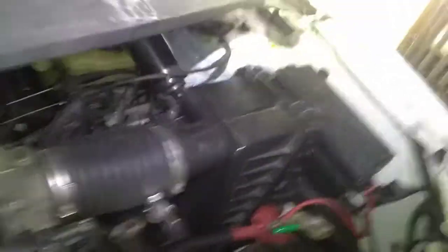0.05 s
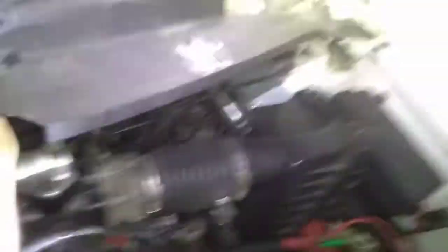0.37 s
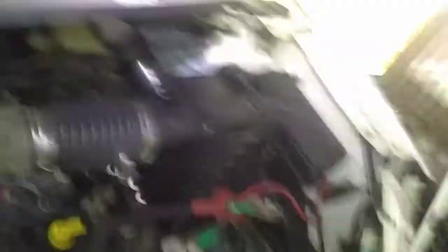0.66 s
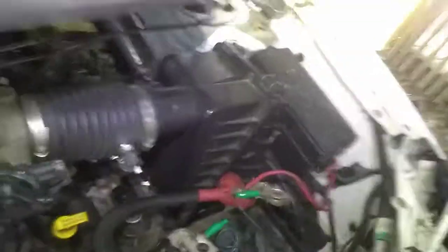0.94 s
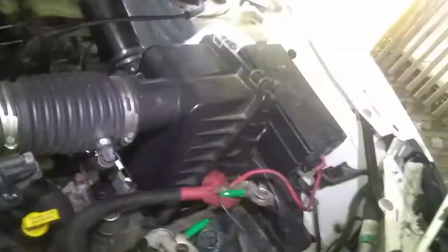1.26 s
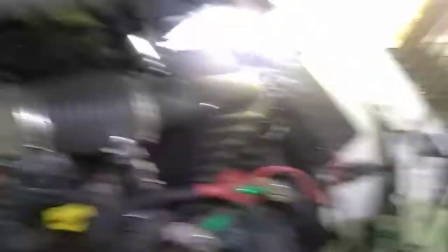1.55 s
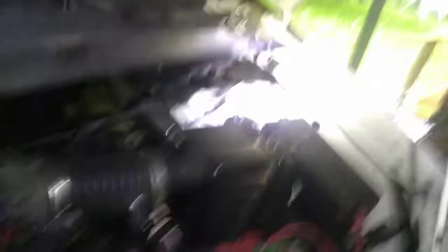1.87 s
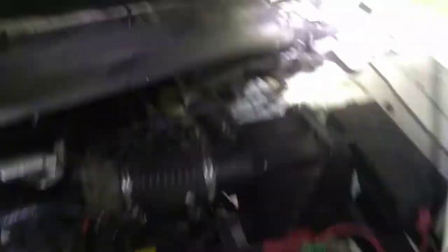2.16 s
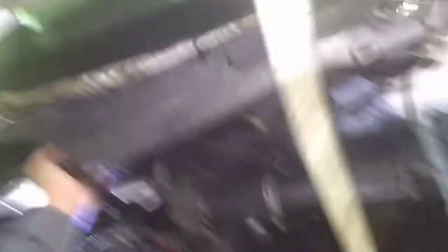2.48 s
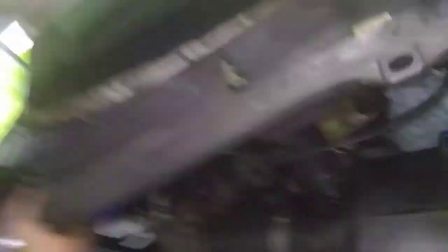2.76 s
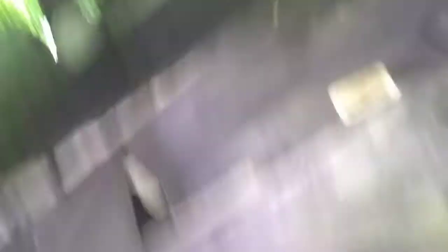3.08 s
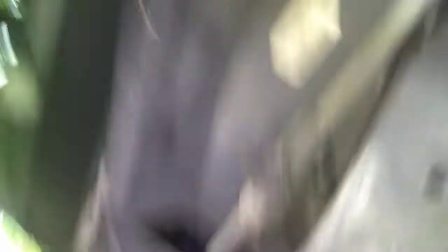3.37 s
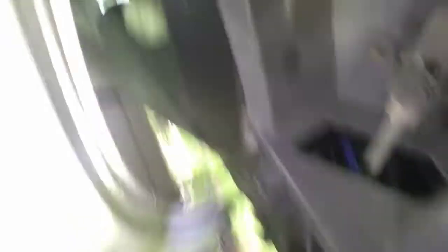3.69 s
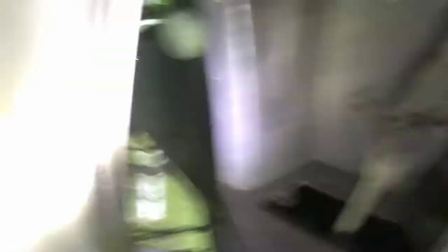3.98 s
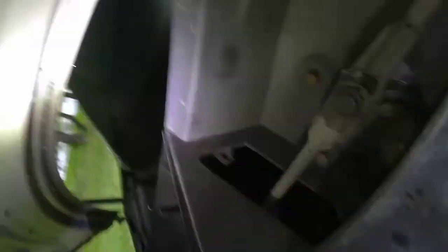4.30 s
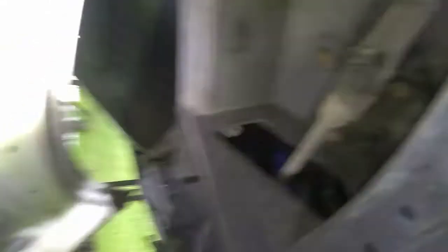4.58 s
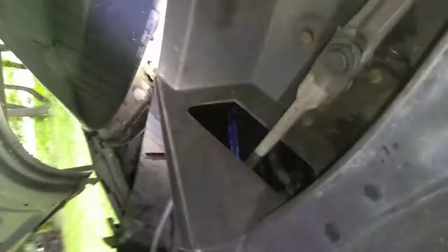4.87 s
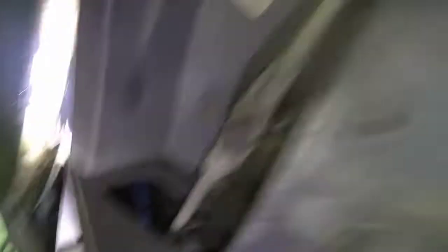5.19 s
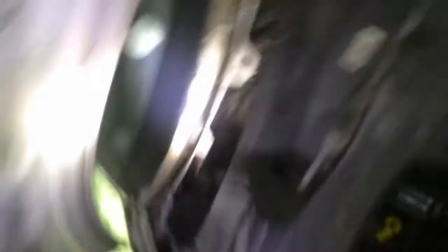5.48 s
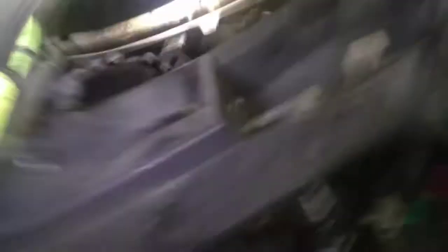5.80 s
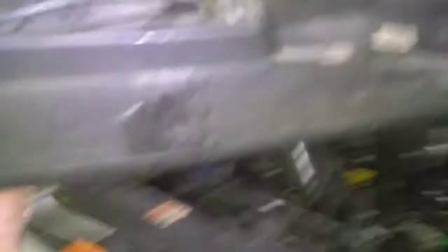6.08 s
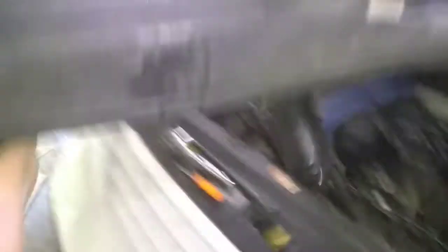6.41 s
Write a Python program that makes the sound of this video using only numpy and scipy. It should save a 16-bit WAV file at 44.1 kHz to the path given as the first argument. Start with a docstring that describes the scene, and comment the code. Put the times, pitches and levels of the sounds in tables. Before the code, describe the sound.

A long plastic panel is worked out of a car's engine bay, close to a hand-held microphone. It opens with a brief judder, a tiny squeak and a cluster of hollow knocks, followed by dull handling thumps. Irregular knocks, some with sharp clicks, continue until about 2 seconds over rubbing rustle and a low rumble of air. A lull follows, with one light scrape near 2.7 seconds. From 3.3 seconds the knocks return more densely, and a hollow in the bodywork hums along. Two heavy blows boom at about 4 and 4.15 seconds; then the rustle drops away while the plastic judders and squeaks briefly. Another strong knock with a scrape comes at 4.9 seconds. At about 5.35 seconds the panel meets something hard with a bright clack, then scrapes away in jerks, fading by 6.6 seconds.

```python
"""A long plastic cowl panel is worked out of an engine bay, close to a rustling hand-held camera.
For two seconds it judders, squeaks and knocks hollowly on the bodywork, some knocks with a sharp click.
After a lull with one light scrape the knocks return, the hollow under the windscreen hums along,
and two heavy blows shake the body. Past five seconds the panel meets something hard with a bright clack
and scrapes away in jerks. The camera subtracts its two microphones from each other for a wide image."""
import sys
import numpy as np
from scipy import signal
from scipy.fft import rfft, irfft
from scipy.io import wavfile
from scipy.ndimage import uniform_filter1d

SR = 44100
rng = np.random.default_rng(int(sys.argv[2]) if len(sys.argv) > 2 else 0)


def put_to_file(sound):
    """Save the sound as 16-bit audio at rate SR, in the file named by the first command-line argument."""
    columns = np.atleast_2d(sound).T  # one column per channel
    safe = np.clip(columns, -1, 1)
    whole_steps = np.round(safe * 32767)
    wavfile.write(sys.argv[1], SR, whole_steps.astype(np.int16))


N = 293265
TIME = np.arange(N) / SR


def undb(db):
    """Decibels to gain."""
    return 10 ** (np.asarray(db) / 20)


def unit_rms(x):
    """Scale to rms 1."""
    return x / np.sqrt(np.mean(x ** 2))


def unit_energy(x):
    """Scale to a mean energy of 1 per channel."""
    return unit_rms(x) / np.sqrt(x.shape[-1])


def freqs(size):
    """Bin frequencies in Hz, floored at 1."""
    return np.maximum(np.fft.rfftfreq(size, 1 / SR), 1)


def contour(points, f):
    """EQ curve in dB through points on a log-frequency axis."""
    hz, db = np.transpose(points)
    return np.interp(np.log(f), np.log(hz), db)


def above(f, corner_hz):
    """Soft shelf from 0 to 1 around the corner."""
    return 1 / (1 + (corner_hz / f) ** 4)


def bell(f, centre_hz, octaves):
    """EQ bell of height 1."""
    return np.exp(-.5 * (np.log2(f / centre_hz) / octaves) ** 2)


def equalise(x, db):
    """Minimum-phase EQ from the folded cepstrum, so attacks stay sharp."""
    size = x.shape[-1]
    cepstrum = irfft(db * np.log(10) / 20, size)
    cepstrum[1:size // 2] *= 2
    cepstrum[size // 2 + 1:] = 0
    return irfft(rfft(x) * np.exp(rfft(cepstrum)), size)


def diffuse(size, alike_hz=800, bass_likeness=0.84):
    """Noise from all sides: the microphones share some bass, but no treble."""
    likeness = bass_likeness * (1 - above(freqs(size), alike_hz))
    mid, side = rfft(rng.standard_normal((2, size))) * np.sqrt([1 + likeness, 1 - likeness])
    return unit_rms(irfft(np.array([mid + side, mid - side]), size))


def wobble(rate_hz, size):
    """Ramps between random values, rms 1."""
    hold = max(int(SR / rate_hz), 1)
    steps = np.repeat(rng.standard_normal(size // hold + 1), hold)
    return unit_rms(uniform_filter1d(steps, hold)[:size])


def fade(t, t60):
    """Decay by 60 dB in t60 seconds."""
    return np.exp(-np.log(1000) * t / t60)


def envelope(t, rise_s, release_at_s, t60):
    """Linear attack, hold, exponential release."""
    return np.minimum(t / rise_s, 1) * fade(np.maximum(t - release_at_s, 0), t60)


def ring(modes, t, scatter_db, detune, spread_rad=0.22):
    """Decaying modes, a little different at each contact; each microphone hears its own phase."""
    hz, db, t60 = np.transpose(modes)[:, :, None]
    strength, shift, phase, skew = rng.standard_normal((4, len(modes), 1))
    angle = 2 * np.pi * hz * (1 + detune * shift) * t + phase
    waves = undb(db + scatter_db * strength) * fade(t, t60) * np.exp(1j * angle)
    pair = [np.sum(waves * np.exp(1j * side * spread_rad * skew), axis=0).imag for side in (1, -1)]
    return unit_energy(np.array(pair))


def pan(db):
    """Stereo gains; positive leans left."""
    return undb([[db / 2], [-db / 2]])


def place(out, sound, start_s, db, head_s=.03):
    """Mix a sound in so that its first head_s has the given rms level."""
    first = int(start_s * SR)
    head_rms = np.sqrt(np.mean(sound[:, :int(head_s * SR)] ** 2))
    out[:, first:first + sound.shape[1]] += (sound * undb(db) / head_rms)[:, :N - first]


# Tone of the open air: freq_hz, gain_db
AIR_EQ = [(25, -37), (100, 0), (300, -9.5), (1000, 2), (3000, -8), (7000, -17), (14000, -20.5)]


def air(db=-68):
    """A faint, steady bed of outdoor hiss."""
    return undb(db) * unit_rms(irfft(rfft(diffuse(N)) * undb(contour(AIR_EQ, freqs(N))), N))


# Fader ride of the rubbing: time_s, level_db
RUB_RIDE = [(0.0, -38.5), (.09, -44.5), (.18, -47.5), (.33, -48), (.5, -45), (0.85, -45), (1.05, -45),
            (1.38, -42), (1.6, -44), (1.81, -46.5), (1.96, -52.5), (2.2, -53), (2.45, -51), (2.92, -54),
            (3.2, -54.5), (4.08, -54), (4.28, -66.5), (4.45, -83), (4.63, -62), (4.78, -64.5), (4.93, -60),
            (5.17, -69), (5.43, -80), (5.58, -68.5), (5.7, -79), (5.85, -59), (5.95, -70), (6.11, -72),
            (6.33, -67), (6.5, -68), (6.65, -67)]
# Tone of the rubbing: freq_hz, gain_db
RUSTLE_EQ = [(20, -35), (60, 6.5), (190, 7.5), (300, -0.5), (550, -1.5), (1000, -3.5), (1700, -13.5),
             (2800, -25.5), (4500, -40), (7000, -51), (10000, -61.5), (14000, -73.5)]
# Camera swings that push air over the microphones: middle_s, spread_s, level_db
CAMERA_SWINGS = [(.45, 0.23, -44.5), (1.05, 0.11, -55), (2.78, 0.15, -44), (4.0, 0.98, -55.5),
                 (5.88, 0.058, -41)]
# Tone of that buffeting: freq_hz, gain_db
RUMBLE_EQ = [(10, -43), (25, -28.5), (40, -16.5), (65, 0), (130, -9), (220, -31), (500, -33), (3000, -85)]


def handling(rustle_db=-41, hiss_db=3, rumble_db=6, still_db=-68, split_hz=2000,
             rustle_slope=0.68, pivot_db=-50.5):
    """Rubbing makes a fine, fluttering rustle; air buffets the microphones as the camera swings."""
    f = freqs(N)
    ride_db = np.interp(TIME, *np.transpose(RUB_RIDE))
    # the lows grow less than the hiss, so harder rubbing is brighter
    low_ride_db = rustle_slope * (ride_db - pivot_db)
    grain = diffuse(N) * undb(-1.18 * wobble(300, N) + wobble(20, N))
    rub = rfft(grain) * undb(contour(RUSTLE_EQ, f))
    rustle = unit_rms(irfft(rub * (1 - above(f, split_hz)), N)) * undb(low_ride_db + rustle_db)
    hiss = unit_rms(irfft(rub * above(f, split_hz), N)) * undb(ride_db + hiss_db)
    draught = undb(still_db) + sum(undb(db) * np.exp(-.5 * ((TIME - middle_s) / spread_s) ** 2)
                                   for middle_s, spread_s, db in CAMERA_SWINGS)
    wind = irfft(rfft(rng.standard_normal((2, N))) * undb(contour(RUMBLE_EQ, f)), N)
    wind = wind - 0.13 * wind[::-1]  # air that presses on one microphone pulls at the other
    gusts = unit_rms(wind * undb(-1.5 * wobble(4.6, N)))
    return rustle + hiss + gusts * draught * undb(rumble_db)


# Hollow tone of the panel, for judders and knocks: freq_hz, gain_db
PANEL_EQ = [(40, -14), (80, -2), (160, 4.5), (300, -7), (550, -13), (1000, -17.5), (1700, -21.5),
            (2800, -30.5), (4500, -49), (7000, -71.5), (10000, -81), (14000, -98)]
# Its bending modes: freq_hz, level_db, t60_s
BENDING_MODES = [(134.7, -5.5, 0.77), (189.3, 4, 0.55), (218.6, 14.5, 0.23), (276.5, 7, 0.45),
                 (325, -17, 0.33), (362, -1.5, 0.4), (423, -5.5, 0.8), (478, -5, 0.52), (503.3, 8, 0.19),
                 (581, 10, 0.12), (744, -4, 0.55), (908, 2.5, 0.37), (1050, 6.5, 0.14), (1260, -9, 0.2)]
# Drags along the bodywork: start_s, length_s, level_db, pitch_hz
JUDDER_CUES = [(0, 0.025, -25, 200), (1.562, 0.03, -36.5, 503), (4.086, 0.095, -26.5, 230),
               (4.362, 0.013, -35.5, 424), (4.418, 0.092, -37.5, 646), (4.561, 0.15, -44, 254),
               (4.985, 0.025, -31, 260)]


def judders(size=24576, catch_db=2, catch_hz=120, ring_db=-2):
    """The panel sticks and slips over the bodywork, which keeps its hollow modes sounding."""
    out, t, f = np.zeros((2, N)), np.arange(size) / SR, freqs(size)
    for start_s, length_s, db, pitch_hz in JUDDER_CUES:
        pressure = envelope(t, rise_s=0.0054, release_at_s=length_s, t60=0.27)
        slips = diffuse(size) * pressure * undb(catch_db * wobble(catch_hz, size))
        modes = ring(BENDING_MODES, t, scatter_db=1.5, detune=.008)
        ringing = irfft(rfft(slips) * rfft(modes), size)
        eq_db = panel_tone(f, pitch_hz, octaves=0.74, boom_db=-7, crack_db=-6)
        sound = unit_energy(equalise(slips, eq_db))
        sound += undb(ring_db) * unit_energy(equalise(ringing, eq_db))
        place(out, sound, start_s, db, head_s=length_s)
    return out


def panel_tone(f, pitch_hz, octaves, boom_db, crack_db):
    """EQ in dB: each contact point favours its own band; soft blows boom, hard ones crack."""
    shelves_db = boom_db * (1 - above(f, 230)) + crack_db * above(f, 1600)
    return contour(PANEL_EQ, f) + 6 * bell(f, pitch_hz, octaves) + shelves_db


# Squeaks of the pulled plastic: start_s, length_s, pitch_hz, glide_hz_per_s, level_db
SQUEAK_CUES = [(0.028, 0.007, 830, -1800, -30), (4.419, 0.023, 688, 3994, -42.5),
               (5.077, 0.045, 402, -3, -46)]


def squeaks(size=8192, waver=0.0079):
    """Plastic slips on paint: short, rough tones that glide."""
    out, t = np.zeros((2, N)), np.arange(size) / SR
    for start_s, length_s, pitch_hz, glide, db in SQUEAK_CUES:
        hz = (pitch_hz + glide * t) * (1 + waver * wobble(480, size))
        tone = np.sin(2 * np.pi * np.cumsum(hz) / SR)
        tone *= envelope(t, rise_s=0.0037, release_at_s=length_s, t60=0.074)
        place(out, np.array([tone, tone]), start_s, db)
    return out


# Panel hits on the bodywork: start_s, level_db, pitch_hz, boom_db, crack_db, t60_s,
# rebound_db, pan_db, low_note_hz, high_note_hz, notes_db
KNOCK_CUES = [(0.0606, -17.5, 470, -19, -9, 0.045, -27, -7, 368, 526, 1.5),
              (.083, -21.5, 430, -15, 1, 0.069, -16, -6, 360, 560, -1.5),
              (.101, -26.5, 400, -9, -10, 0.2, -13, -3, 353.5, 797, -4),
              (0.1101, -24, 340, -6, -16, 0.085, -5.5, -4, 330, 443, -9),
              (0.2497, -20, 760, -5.5, -1, 0.093, -26, -0.5, 486, 602, -9.5),
              (0.874, -30, 378, 0, -7, 0.21, -17, 1.5, 373, 459, -7),
              (1.11, -32, 754, -15, -2, 0.058, -23, -5, 520, 720, -16),
              (1.300, -24, 616, -4.5, 4, 0.09, -30, 0, 375, 1010, -8),
              (1.455, -32, 613, -20, 5, 0.045, -0.5, -6, 577, 1030, -8),
              (1.503, -22.5, 705, -9, 5, 0.093, -12.5, 0, 415, 510, -9),
              (1.645, -26.5, 614, -2.5, -21, 0.048, -25, -1.5, 364, 667, -8),
              (1.883, -19.5, 680, -9, 5, 0.21, -11.5, -4, 386, 682, -16),
              (2.057, -31.5, 680, -15, 4, 0.16, -8.5, -2.5, 352, 665, -2.5),
              (3.319, -26.5, 420, 2, -44, 0.052, -28, 6.5, 271, 567, -1.5),
              (3.387, -27.5, 860, -7.5, -2, 0.14, -6, -3.5, 503, 575, -7.5),
              (3.44, -24, 490, -1.5, 4, 0.072, -32, 8, 397, 587, -8.5),
              (3.522, -26, 1230, -12.5, 4, 0.14, -16, 0.5, 475, 609, -7),
              (3.573, -29.5, 915, -7, -0.5, 0.059, -19, 3, 337, 880, -5),
              (3.61, -32, 1090, -4, -1, 0.12, -26, -0.5, 350, 575, -2.5),
              (3.980, -19.5, 900, -3, 12.5, 0.13, -11, 1, 486, 568, -6),
              (3.990, -22.5, 563, -2, -13.5, 0.1, -22, 12, 505, 589, -3.5),
              (4.033, -25, 900, -1, -8, 0.11, -15, 8, 190, 375, -10),
              (4.103, -36, 800, -1, -14, .05, -25, -2, 210, 560, -7),
              (4.147, -16.5, 418, -7.5, -0.5, 0.051, -22.5, -7, 428, 488, -2),
              (4.166, -23.5, 500, -8, -7, .05, -18, -6, 389, 574, 1),
              (4.204, -25, 500, -8, -7, 0.065, -21, -5.5, 397, 460, 2.5),
              (4.2939, -29, 950, -12, -1.5, 0.08, -15, -3.5, 343, 468, -1),
              (4.876, -30.5, 324, -20, -2.5, 0.22, -27, 5, 243, 404, 1.5),
              (4.920, -17.5, 890, -8, -10, 0.072, -21, 1.5, 404.5, 695, -4),
              (4.931, -23, 750, -15, 3, 0.022, -30, 9, 391, 960, 0),
              (5.024, -32, 350, -5, -10, .05, -22, 1, 280, 404, -9)]


def knocks(size=16384, blow_db=-3, chatter_db=-7, edge_db=5, tick_db=-8, bay_db=-17, modes_db=-5):
    """A chattering blow sets the panel ringing; the engine bay adds a short, dense tail."""
    out, t, f = np.zeros((2, N)), np.arange(size) / SR, freqs(size)
    for start_s, db, pitch_hz, boom_db, crack_db, t60, pan_db, low_hz, high_hz, notes_db in contacts():
        blow = np.zeros((2, size))
        blow[:, 0] = undb(blow_db)
        chatter_s = np.cumsum(rng.uniform(.002, .007, 6))
        chatter = undb(chatter_db) * np.exp(-chatter_s / 0.01) * rng.uniform(.5, 1, 6)
        blow[:, (chatter_s * SR).astype(int)] = chatter
        far_mic = int(pan_db > 0)
        blow[far_mic] = np.roll(blow[far_mic], rng.integers(4, 10))  # arrives a little later
        blow = equalise(blow, edge_db * above(f, 1800))  # the contact is brighter than its ring
        scatter = diffuse(size)
        treble = irfft(rfft(scatter) * above(f, 1600), size)
        tick = undb(tick_db) * unit_energy(treble * fade(t, t60=0.0057))  # the edge's first touch
        bay = undb(bay_db) * unit_energy(scatter * fade(t, t60=0.26))
        eq_db = panel_tone(f, pitch_hz, octaves=0.42, boom_db=boom_db, crack_db=crack_db)
        hit = equalise(blow + tick + sheet_ring(t, t60) + bay, eq_db)
        modes = equalise(ring(BENDING_MODES, t, scatter_db=1.5, detune=.008), eq_db)
        notes = undb(notes_db) * spot_ring(t, low_hz, high_hz, t60)
        sound = unit_energy(hit) + undb(modes_db) * unit_energy(modes) + notes
        give = 1 - np.exp(-t / 0.00047)  # the plastic yields before it takes the full blow
        place(out, sound * give * pan(pan_db), start_s, db)
    return out


def contacts(rebound_s=.054):
    """Each knock, then the springy panel falling back once: lower, duller and ringing longer."""
    for start_s, db, pitch_hz, boom_db, crack_db, t60, rebound_db, *spot in KNOCK_CUES:
        yield start_s, db, pitch_hz, boom_db, crack_db, t60, *spot
        yield (start_s + rebound_s, db + rebound_db, pitch_hz * 0.91,
               boom_db, crack_db - 9.5, t60 * 1.2, *spot)


def sheet_ring(t, t60, grain_db=3):
    """Countless close modes of a plastic sheet, of which the low ones last longest."""
    size = len(t)
    f = freqs(size)
    noise = rfft(diffuse(size) * undb(grain_db * wobble(300, size)))
    over_mid, over_high = above(f, 650), above(f, 1900)
    bands = [(1 - over_mid, t60 * 1.67), (over_mid - over_high, t60 * 0.94), (over_high, t60 * 0.95)]
    return unit_energy(sum(irfft(noise * band, size) * fade(t, tail_s) for band, tail_s in bands))


def spot_ring(t, low_hz, high_hz, t60, stiffening=0.025, relax_s=0.018):
    """The struck spot rings on two hollow notes, a little sharp while it is still bent."""
    bent_t = t + stiffening * relax_s * (1 - np.exp(-t / relax_s))
    notes = [(low_hz, 0, t60 * 1.83), (high_hz, -2, t60 * 1.45)]
    return unit_energy(ring(notes, bent_t, scatter_db=.5, detune=.003) * np.minimum(t / .001, 1))


# Bright tone of the clicks and swishes: freq_hz, gain_db
EDGE_EQ = [(300, -17.5), (1500, 14.5), (3000, 1), (4200, -7.5), (5300, -10.5), (7000, -14), (10000, -24),
           (14000, -37)]
# Ring of a hard contact, for clicks and scrapes: freq_hz, level_db, t60_s
CLACK_MODES = [(445, 3, 0.082), (600, -6, 0.084), (696, -31, 0.24), (831, -4.5, 0.17), (1076, -2.5, 0.18),
               (1290, 2.5, 0.1), (1490, -15, 0.17), (1895, 0, 0.077), (2603, 1, 0.1), (3150, -8, 0.048),
               (3500, 10, 0.029), (3710, 4.5, 0.074)]
# Clicks layered on the attacks: start_s, level_db, t60_s, pitch_hz
CLICK_CUES = [(0.061, -23.5, 0.016, 3000), (1.302, -32, 0.018, 3000), (1.503, -28.5, 0.016, 2800),
              (1.882, -30.5, 0.064, 2720), (3.442, -37.5, 0.012, 3320), (3.522, -36, 0.02, 1710),
              (3.981, -27, 0.037, 5000), (4.147, -31.5, 0.02, 4760), (4.294, -49, .03, 3000),
              (4.875, -53, 0.037, 3140), (4.920, -34.5, 0.032, 3140), (4.928, -42, 0.03, 3000),
              (4.938, -35.5, 0.074, 3100), (5.359, -26, 0.071, 3330), (5.648, -48, .03, 3400),
              (5.914, -46, .04, 3200)]


def attack_clicks(size=4096, rise_s=0.00079, pitch_db=8, ring_db=-11):
    """Sharp, dry clicks with a brief, hard ring at the attack of knocks, the clack and scrapes."""
    out, t, f = np.zeros((2, N)), np.arange(size) / SR, freqs(size)
    for start_s, db, t60, pitch_hz in CLICK_CUES:
        eq_db = contour(EDGE_EQ, f) + pitch_db * bell(f, pitch_hz, octaves=0.14)
        click = equalise(diffuse(size) * np.minimum(t / rise_s, 1) * fade(t, t60), eq_db)
        ringing = equalise(ring(CLACK_MODES, t, scatter_db=2, detune=.04), eq_db)
        place(out, unit_energy(click) + undb(ring_db) * unit_energy(ringing), start_s, db, head_s=.002)
    return out


# Tone of a soft bump: freq_hz, gain_db
BUMP_EQ = [(30, -9), (70, 6.5), (120, 11.5), (190, 2.5), (320, -6.5), (600, -20), (2000, -53), (14000, -86)]
# Shifts of the grip: start_s, level_db
BUMP_CUES = [(0.256, -27), (0.309, -26.5), (0.34, -31), (.418, -24), (0.506, -24), (0.551, -24),
             (0.638, -30.5), (2.831, -34), (2.966, -37), (3.579, -36), (5.119, -33.5), (6.104, -38),
             (6.224, -37.5)]


def hand_bumps(size=8192, t60=0.17, pan_db=-7):
    """The hand shifts on the camera body: dull, damped thumps, nearer the right microphone."""
    out, t = np.zeros((2, N)), np.arange(size) / SR
    for start_s, db in BUMP_CUES:
        burst = diffuse(size, bass_likeness=0.065) * fade(t, t60)
        thump = equalise(burst, contour(BUMP_EQ, freqs(size)))
        place(out, thump * pan(pan_db), start_s, db)
    return out


# Light brushing contacts: start_s, level_db, rise_s, t60_s
SWISH_CUES = [(2.716, -69, 0.045, 0.82), (4.93, -52.5, 0.011, 0.1), (5.352, -58, .008, 0.26),
              (5.649, -59, 0.019, 0.27), (5.912, -69, 0.011, 0.33), (6.03, -74, .05, 0.47)]


def swishes(size=32768, low_cut_hz=7000):
    """The panel's edge brushes along: fine hiss that swells and fades."""
    out, t, f = np.zeros((2, N)), np.arange(size) / SR, freqs(size)
    for start_s, db, rise_s, t60 in SWISH_CUES:
        hiss = irfft(rfft(diffuse(size)) * above(f, low_cut_hz) * undb(contour(EDGE_EQ, f)), size)
        place(out, hiss * np.minimum(t / rise_s, 1) * fade(t, t60), start_s, db)
    return out


# Tone of a hard contact: freq_hz, gain_db
SCRAPE_EQ = [(40, -51), (90, -12.5), (150, -2), (300, -10), (550, -11), (1000, -13), (1700, -13.5),
             (2800, -15), (4500, -23.5), (7000, -36), (10000, -43), (14000, -59)]
# Clacks and scrapes: start_s, level_db, rise_s, t60_s, treble_db, hollow_hz, hollow_db
SCRAPE_CUES = [(2.718, -37, 0.019, 0.36, -4, 1000, 1.5), (3.889, -44.5, 0.041, 0.49, -11.5, 520, 3),
               (4.927, -27, 0.014, 0.32, -14.5, 980, -3.5), (5.332, -46.5, 0.0018, 0.045, -12, 1200, -1),
               (5.349, -19.5, 0.013, 0.073, -3, 1090, -0.5), (5.358, -27.5, 0.02, 0.29, 4, 1910, 2.5),
               (5.645, -32.5, 0.0048, 0.42, -1.5, 550, 10.5), (5.715, -39, 0.015, 0.33, 2.5, 990, 13.5),
               (5.796, -38, 0.0052, 0.24, -9.5, 650, 0.5), (5.853, -40, 0.018, 0.66, -5.5, 1090, 9),
               (5.91, -33.5, 0.0068, 0.48, -3.5, 940, 1.5), (6.029, -45.5, 0.032, 0.41, -4.5, 980, 3),
               (6.43, -61.5, 0.045, 0.51, 8, 1860, 9.5), (6.605, -63, 0.0015, 0.095, 4, 6000, 9)]


def scrapes(size=24576, ring_db=-14, grit_db=-4):
    """The edge catches and slides on something hard: a swell of tiny contacts that rings briefly."""
    out, t, f = np.zeros((2, N)), np.arange(size) / SR, freqs(size)
    for start_s, db, rise_s, t60, treble_db, hollow_hz, hollow_db in SCRAPE_CUES:
        pressure = envelope(t, rise_s, rise_s, t60)
        slips = (diffuse(size) + undb(grit_db) * grit(size) * np.sqrt(pressure)) * pressure
        modes = ring(CLACK_MODES, t, scatter_db=1, detune=.03)
        ringing = irfft(rfft(slips) * rfft(modes), size)
        sound = unit_energy(slips) + undb(ring_db) * unit_energy(ringing)
        eq_db = contour(SCRAPE_EQ, f) + treble_db * above(f, 1700)
        eq_db += hollow_db * bell(f, hollow_hz, octaves=0.31)
        place(out, equalise(sound, eq_db), start_s, db)
    return out


def grit(size, per_s=180, spread_db=4.5):
    """Sparse ticks of uneven strength, each nearer to one microphone."""
    ticks = (rng.random(size) < per_s / SR) * rng.choice([-1, 1], size)
    strength_db = spread_db * np.minimum(rng.exponential(size=(2, size)), 4)
    return unit_rms(ticks * undb(strength_db))


# The hollow's note shifts as the camera moves about in it: time_s, pitch_hz
HUM_PITCH = [(3.35, 223.5), (3.65, 212), (3.99, 190), (4.06, 194), (4.13, 215.3), (4.23, 193),
             (4.45, 211.2), (4.95, 222)]


def cavity_hum(panel, from_s=3.4, to_s=4.99, ramp_s=.03, t60=0.59, gain_db=5.5, size=32768):
    """Air in the hollow under the windscreen resonates with the panel while the camera is held in it."""
    inside = np.clip(np.minimum(TIME - from_s, to_s - TIME) / ramp_s, 0, 1)
    decay = fade(np.arange(size) / SR, t60)
    pitch_hz = np.interp(TIME, *np.transpose(HUM_PITCH))
    carrier = np.exp(2j * np.pi * np.cumsum(pitch_hz) / SR)
    # a gliding resonator: shift the note down to 0 Hz, give it a tail, shift it back
    stored = signal.fftconvolve(panel * inside / carrier, decay[None] / decay.sum(), axes=1)[:, :N]
    return 2 * undb(gain_db) * (stored * carrier).real


# Boom of the bodywork: freq_hz, level_db, t60_s
BODYWORK_MODES = [(87.6, -1.5, 0.54), (108.5, -2, 0.29), (145.4, -11, 0.46), (208, -15, 0.75),
                  (304, -13, 0.58), (351, -11, .24), (407, -13, 0.23), (448, -6, 0.12), (504, -11, 0.17),
                  (567.4, -8.5, 0.23)]
# Heavy blows: start_s, level_db
THUD_CUES = [(3.987, -28), (4.148, -17)]


def thuds(size=32768, pan_db=-3, push_s=0.0082):
    """The bodywork takes up a heavy blow over a few milliseconds and booms on."""
    out, t = np.zeros((2, N)), np.arange(size) / SR
    push = 1 - np.exp(-(t / push_s) ** 2)
    for start_s, db in THUD_CUES:
        boom = push * ring(BODYWORK_MODES, t, scatter_db=.5, detune=.002, spread_rad=.2)
        place(out, boom * pan(pan_db), start_s, db)
    return out


def scene():
    """The stereo mix at the microphones; knocks and judders also feed the hollow."""
    panel = knocks() + judders()
    work = panel + cavity_hum(panel) + attack_clicks() + squeaks() + thuds() + scrapes() + swishes()
    return work + hand_bumps() + handling() + air()


def record(dry, crossfeed=0.59, crossfeed_top_hz=9000, lag_s=.000476, high_cut_hz=14300):
    """Each channel loses a delayed share of the other, widening and combing the sound; the top is cut."""
    lag = round(lag_s * SR)
    opposite = irfft(rfft(dry[::-1]) * (1 - above(freqs(N), crossfeed_top_hz)), N)
    wide = dry - crossfeed * np.pad(opposite, ((0, 0), (lag, 0)))[:, :N]
    high_cut = signal.ellip(10, .2, 80, high_cut_hz, fs=SR, output="sos")
    return signal.sosfilt(high_cut, np.clip(wide, -1, 1))


dry = scene()
out = record(dry)
put_to_file(out)
```